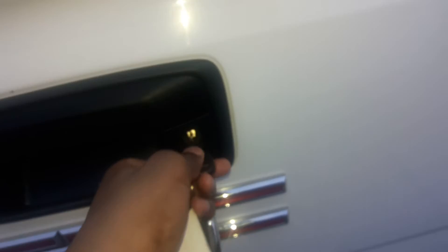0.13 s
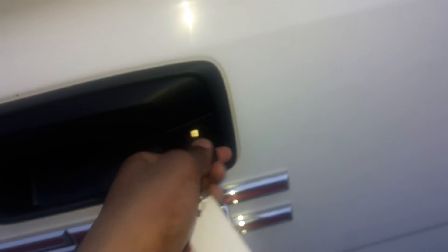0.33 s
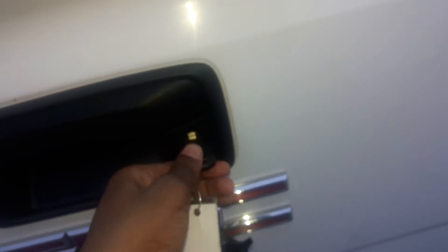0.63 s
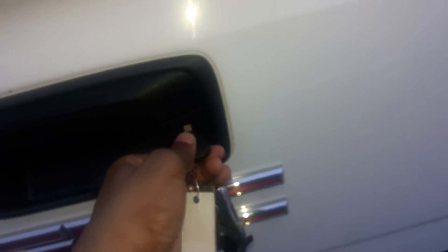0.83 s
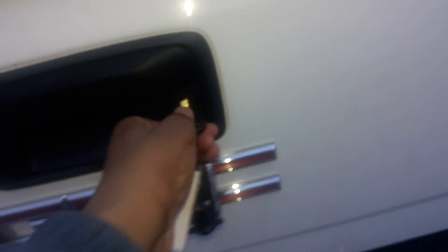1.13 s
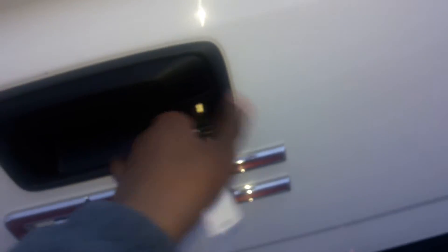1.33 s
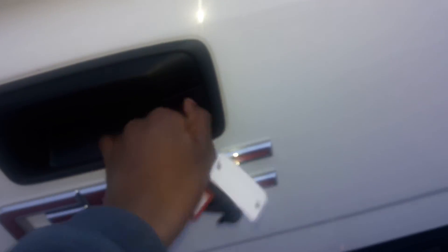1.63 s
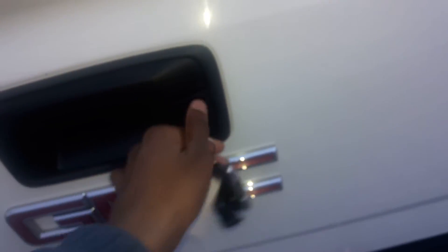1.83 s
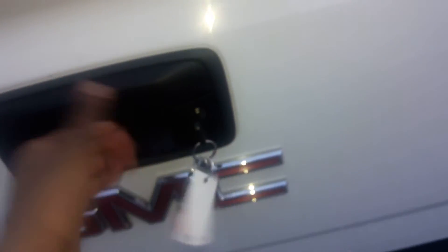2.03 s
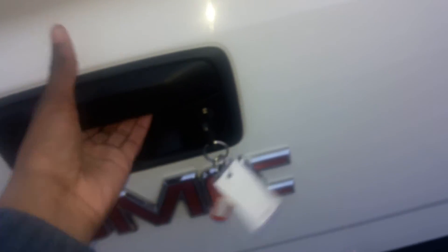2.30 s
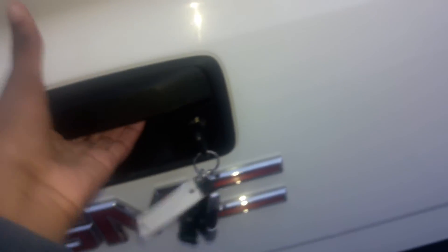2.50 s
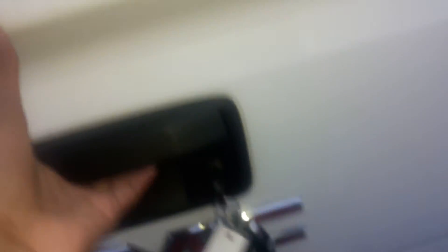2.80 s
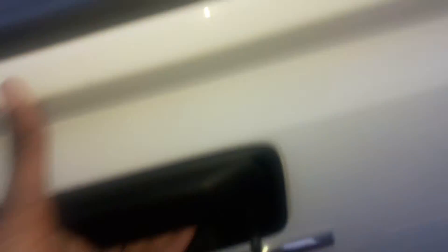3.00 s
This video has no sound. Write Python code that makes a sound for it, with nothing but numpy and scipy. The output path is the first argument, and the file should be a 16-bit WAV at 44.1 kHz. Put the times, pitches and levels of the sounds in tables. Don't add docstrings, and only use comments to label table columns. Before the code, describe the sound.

Keys scrape and click into a tailgate lock, the lock turns with a sharp clack, then the latch clunks loudly; outdoors, faint traffic and wind, close handheld stereo microphone with handling thumps.

```python
import sys
import numpy as np
from scipy import signal
from scipy.fft import rfft, irfft
from scipy.io import wavfile

SR = 44100
rng = np.random.default_rng(int(sys.argv[2]) if len(sys.argv) > 2 else 0)


def store_pcm(level_fs):
    pcm = np.round(np.clip(level_fs, -1, 1) * 32767).astype(np.int16)
    wavfile.write(sys.argv[1], SR, np.atleast_2d(pcm).T)


def elevation(decibels):
    levels = np.asarray(decibels, float)
    return 10 ** (levels / 20)


N = 138915
LEFT_LAG_S = 0.000271


def rms_one(x):
    return x / np.sqrt(np.mean(x ** 2) + 1e-20)


def in_time(rows):
    return np.interp(np.arange(N) / SR, *np.transpose(rows))


def at_hz(hz, points):
    point_hz, level_db = np.transpose(points)
    return np.interp(np.log(hz), np.log(point_hz), level_db)


def colour(x, points):
    hz = np.maximum(np.arange(N // 2 + 1) * SR / N, 1)
    return irfft(rfft(x) * elevation(at_hz(hz, points)), N)


def peak(x, hz, width_hz):
    r = np.exp(-np.pi * width_hz / SR)
    poles = [1, -2 * r * np.cos(2 * np.pi * hz / SR), r * r]
    return signal.lfilter([(1 - r * r) / 2, 0, (r * r - 1) / 2], poles, x + 1e-18)


def cut(x, hz, kind):
    return signal.sosfilt(signal.butter(2, hz, kind, fs=SR, output="sos"), x)


def drift(rate_hz):
    return rms_one(cut(rng.standard_normal(N + SR), rate_hz, "low")[SR:])


def grains(per_s, spread_db):
    hit = rng.random(N) < per_s / SR
    size = elevation(spread_db * np.minimum(rng.exponential(1, N), 4))
    return rms_one(hit * size * rng.choice([-1, 1], N))


def ports(x, pan_db=0., lag_s=0.):
    late = np.interp(np.arange(len(x)) - lag_s * SR, np.arange(len(x)), x)
    return np.array([late * elevation(pan_db / 2), x * elevation(-pan_db / 2)])


def add(out, s, x):
    i = int(s * SR)
    out[..., i:i + x.shape[-1]] += x[..., :N - i]


# hz [Hz], level_db [dB per Hz]
ROAD_SPECTRUM = [(55,-12.5),(250,-4),(520,-8),(800,-1.5),(2050,-17.5),(3300,-41.5),(5200,-52),(16000,-64)]
# start_s [s], level_db [dB]
ROAD_SWELL = [(0,-38),(.3,-35.5),(.55,-37.5),(2.7,-38),(2.9,-41.5),(3.15,-38)]


def traffic():
    roar = rms_one(colour(rng.standard_normal((3, N)), ROAD_SPECTRUM))
    shared = 0.39
    both = np.sqrt(shared) * ports(roar[0], lag_s=0.00025) + np.sqrt(1 - shared) * roar[1:]
    left_db = -1
    swell_db = in_time(ROAD_SWELL) + 4 + 1.45 * drift(18)
    return both * elevation(swell_db) * elevation([[left_db / 2], [-left_db / 2]])


# start_s [s], level_db [dB]
HUM_LEVEL = [(0,-54),(.3,-41),(.7,-39),(.78,-60),(.92,-48),(1.0,-43.5),(1.6,-34),(1.9,-70)]


def panel_hum():
    hum_hz, width_hz = 265.4, 29.5
    narrow = peak(peak(rng.standard_normal(N), hum_hz, width_hz), hum_hz, width_hz)
    return elevation(in_time(HUM_LEVEL)) * rms_one(narrow)


# start_s [s], level_db [dB]
GUST_LEVEL = [(0,-43),(.17,-40.5),(.22,-30.5),(.4,-34.5),(.75,-46.5),(1.0,-37),(1.6,-40),(1.73,-20),(1.84,-26.5),(1.93,-24.5),(2.0,-32),(2.48,-30.5),(2.58,-21.5),(2.72,-22.5),(2.77,-39),(2.9,-25.5),(2.95,-35.5),(3.15,-31)]


def gusts():
    lumps = []
    for _ in range(2):
        x = peak(grains(450, 2.0), 141, 167)
        lumps.append(rms_one(cut(cut(x, 427, "low"), 60, "high")))
    left = elevation(-5.5) * (lumps[1] + lumps[0] / 3)
    return elevation(in_time(GUST_LEVEL) + 3) * np.array([left, lumps[0]])


def boom():
    boom_hz, width_hz = 167.4, 29
    shake = peak(peak(rng.standard_normal(N), boom_hz, width_hz), boom_hz, 2 * width_hz)
    return elevation(in_time(GUST_LEVEL) - 7.5) * rms_one(shake)


# start_s [s], peak_db [dB], top_hz [Hz]
PORT_KNOCKS = [(1.673, -20.5, 1090), (1.727, -42, 1100.0), (1.75, -15.5, 1070), (1.783, -21, 1400.0),
               (1.793, -17.5, 1110), (1.83, -17.5, 1090), (1.844, -22, 1100.0), (1.872, -18, 1110),
               (1.907, -15, 1130), (2.405, -20, 1100.0), (2.568, -17, 1100.0), (2.584, -14.5, 1090),
               (2.796, -16, 910), (2.854, -17, 1120), (2.897, -20, 1100.0), (2.6143, -11, 2000),
               (2.6305, -18.5, 1500), (2.6357, -11.5, 1200), (2.6425, -14, 900), (2.6448, -10, 2130),
               (2.6945, -17.5, 500), (2.6997, -16, 1600), (2.7085, -15, 1310), (.992, -27, 496),
               (1.126, -25.5, 213), (1.31, -24, 330), (1.337, -26.5, 326), (1.924, -19.5, 408),
               (2.224, -23, 430), (2.517, -31, 396)]


def knocks():
    out, click = np.zeros(N), np.eye(1, 2500)[0]
    for s, db, top_hz in PORT_KNOCKS:
        x = peak(click, 180, 242)
        for low_pass_hz in (top_hz, 0.69 * top_hz, 3300, 3600):
            x = cut(x, low_pass_hz, "low")
        x = cut(x, 66, "high")
        add(out, s, elevation(db + 11.5) * x / np.abs(x).max())
    left_db = -37
    return out * elevation([[left_db], [0]])


def slide():
    length_s, from_hz, to_hz = 0.17, 9900, 11900
    out, t = np.zeros((2, N)), np.arange(int(length_s * SR)) / SR
    phase = 2 * np.pi * np.cumsum(np.interp(t, [0, length_s], [from_hz, to_hz])) / SR
    a, b = cut(rng.standard_normal((2, 2, len(t))), 700, "low")
    hiss = rms_one(a * np.cos(phase) + b * np.sin(phase))
    add(out, .165, elevation(-70 + 3 * drift(30)[:len(t)]) * hiss * np.minimum(t / .02, 1))
    return out


# start_s [s], length_s [s], level_db [dB]
KEY_RUBS = [(0.159,0.052,-60),(0.22,.035,-57.5),(0.255,0.1,-64.5),(0.626,0.066,-56),(.84,0.045,-63),(1.325,0.058,-60),(1.435,0.12,-62.5),(1.673,0.09,-58),(1.696,0.043,-43),(1.734,.042,-48.5),(1.86,0.025,-47),(2.002,0.044,-65),(2.135,0.05,-61.5),(2.166,0.021,-62),(2.28,0.11,-62),(2.383,0.11,-65.5),(3.09,0.017,-58.5),(3.115,0.046,-56.5)]
# hz [Hz], level_db [dB per Hz]
RUB_SPECTRUM = [(2000,-7),(3800,1.5),(6300,-5),(7300,1),(8500,-6),(11500,-11.5),(16000,-16)]


def rubs():
    t, shape = np.arange(N) / SR, 0
    for s, length_s, db in KEY_RUBS:
        rise = (t - s) / 0.0099
        fall = (s + length_s - t) / (0.76 * length_s) + 0.52
        shape = shape + elevation(db) * np.clip(np.minimum(rise, fall), 0, 1)
    scratch = [rms_one(colour(grains(3500, 1.7), RUB_SPECTRUM)) for _ in range(3)]
    unsteady = elevation(2.9 * drift(70) + 1.2 * drift(12.0))
    both = 0.39 * ports(scratch[0], lag_s=LEFT_LAG_S) + 0.79 * np.array(scratch[1:])
    return shape * unsteady * both


# hz [Hz], width_hz [Hz], level_db
# [dB]
KEY_MODES = [(3310,1240,-8.5),(4270,1800,-5.5),(5500,780,-2),(7350,294,2.5),(8860,870,-3),(11480,370,-4.5),(12510,310,-2),(13700,4800,-20)]


def metal(x, strengths_db):
    rings = 0
    for k, ((hz, width_hz, db), own_db) in enumerate(zip(KEY_MODES, strengths_db)):
        rings = rings + (-1) ** k * elevation(db + own_db) * peak(x, hz, width_hz)
    crack = cut(cut(x, 2260, "high"), 13500, "low")
    return rings + elevation(-8.5 - 15.5) * crack


# start_s [s], peak_db [dB], brightness [dB per octave]
KEY_TOUCHES_IN = [(.122, -51, -7), (.529, -50, 4), (.612, -50, 1.5), (.648, -41, 1.5), (.691, -52, -1.5),
                  (0.179, -36, -20), (0.1956, -40, -5), (.1915, -46, -2), (0.2294, -48, 7),
                  (.2721, -48, 14), (.3155, -50, 6), (0.3192, -46, 0.1), (.3349, -38.5, 4),
                  (0.3527, -24, -31), (0.3644, -53, 5), (0.4215, -47, 13), (0.5197, -41, -10),
                  (0.5473, -39.5, -11), (0.5701, -45.5, -7), (0.595, -49, 0.1), (0.617, -40, -9),
                  (0.638, -36.5, -4), (0.6675, -38, 1), (0.7276, -38.5, -10.5), (0.8167, -31, -5),
                  (0.9436, -26.5, -2), (0.9777, -31, -2), (1.0585, -47.5, -7), (1.297, -44, -6),
                  (1.345, -28, 59), (1.359, -37, -4), (1.4606, -29.5, -8.5)]
# start_s [s], peak_db [dB], brightness [dB per octave]
KEY_TOUCHES_OUT = [(1.6626, -38, 8), (1.6685, -42, 1.5), (1.6878, -16.5, 6), (1.7083, -19.5, -12),
                   (1.714, -20, 11), (1.7365, -32.5, -6), (1.7445, -44, -3), (1.7547, -30, 1.5),
                   (1.769, -39, -1.5), (1.778, -44, 3), (1.7925, -39, -2), (1.8464, -44, -10),
                   (1.8654, -17.5, 2.5), (1.8891, -31.5, -13), (2.0097, -28, 2.5), (2.0837, -43.5, -5),
                   (2.174, -45.5, 1), (2.1367, -54, -3), (2.191, -45, -2), (2.239, -43.5, -13),
                   (2.2508, -42, -9), (2.2724, -47, -17), (2.2949, -54, -15), (2.326, -51, -10),
                   (2.356, -42, -11), (2.4842, -44.5, -10), (2.668, -44, -8), (2.7476, -17.5, -5),
                   (2.834, -27.5, -2.5)]


def touches():
    out, t = np.zeros((2, N)), np.arange(3000) / SR
    octaves = np.minimum(np.log2(np.array(KEY_MODES)[:, 0] / 7000), .65)
    t60_s, bounce_db = 0.015, -17
    for s, db, tilt_db in list(KEY_TOUCHES_IN) + list(KEY_TOUCHES_OUT):
        later = t - rng.uniform(.004, .011)
        bounce = elevation(bounce_db - 60 * later / t60_s / 2) * (later > 0)
        scuff = (elevation(-60 * t / t60_s) + bounce) * rng.standard_normal((3, len(t)))
        x = metal(scuff, tilt_db * octaves + rng.normal(0, 1.0, len(KEY_MODES)))
        x = ports(x[0], -2, LEFT_LAG_S) + x[1:]
        add(out, s, elevation(db) * x / np.abs(x).max())
    return out


# start_s [s], peak_db [dB], centre_hz [Hz], t60_s [s], left_right_db [dB]
PART_CLACKS = [(.176,-21,900,.02,-4),(1.663,-25,1700,.015,-3),(3.03,-39.5,3400,.015,6),(.352,-22,3870,0.007,0),(1.662,-16.5,3360,0.013,9.5),(1.709,-8,1300,0.026,-1),(2.6135,-17.5,1525,0.0061,-27),(2.6355,-23.5,1900,0.0035,-19),(2.6445,-19,1710,0.006,-22.5),(2.748,-12,1500,.05,-12),(.352,-25,1880,0.011,-4),(3.011,-24,1260,0.033,-9),(1.709,-17,2500,0.018,0),(2.696,-19.5,780,0.036,-27),(2.71,-15.5,870,0.022,-18),(3.006,-18,860,0.083,-19),(3.082,-22,504,0.016,-26),(3.091,-27.5,2330,0.033,11)]


def clacks():
    out, t = np.zeros((2, N)), np.arange(5000) / SR
    span = 1.32
    for s, db, hz, t60_s, pan_db in PART_CLACKS:
        snap = 3.6 * (np.abs(t - .0006) < .00008)
        x = (rng.standard_normal(len(t)) + snap) * elevation(-60 * t / t60_s) * np.minimum(t / 0.00071, 1)
        x = cut(x, hz / span, "high")
        for low_pass_hz in (hz * span, hz * span, 0.88 * hz * span, 1.43 * hz):
            x = cut(x, low_pass_hz, "low")
        add(out, s, ports(elevation(db) * x / np.abs(x).max(), pan_db, LEFT_LAG_S))
    return out


def panel_bursts(rows, points, decay_tilt):
    out, t = np.zeros((2, N)), np.arange(14000) / SR
    edges_hz = 110 * 2 ** np.arange(0, 7.3, .5)
    for s, db, t60_s, tilt_db in rows:
        rattle = elevation(-0.5 * drift(180)[:len(t)] * np.minimum(t / 0.0044, 1))
        white = rng.standard_normal((3, len(t))) * rattle
        white = ports(white[0], lag_s=LEFT_LAG_S) + 1.24 * cut(white[1:], 700, "high")
        x = 0
        for low, high in zip(edges_hz, edges_hz[1:]):
            level_db = at_hz(low * 1.355, points) + tilt_db * np.log2(low / 1000)
            band_t60_s = t60_s * (low / 1000) ** -decay_tilt
            shape = elevation(-60 * t / band_t60_s) * np.minimum(t / 0.00048, 1)
            x = x + elevation(level_db) * cut(white * shape, [low, high], "band")
        add(out, s, elevation(db) * x / np.sqrt(np.mean(x[:, :900] ** 2)))
    return out


# start_s [s], level_db [dB], t60_s [s at 1 kHz], brightness [dB per octave]
LOCK_BLOWS = [
    (0.353,-28,0.0066,0.5),
    (1.459,-38.5,0.043,9.5),
    (1.662,-31.5,0.18,7.5),
    (1.709,-20,0.086,0),
]
# hz [Hz], level_db [dB per Hz]
PANEL_SPECTRUM = [(100,-16),(200,5),(450,-5),(800,-4.5),(1600,-3),(3300,-40),(7300,-37.5),(16000,-82)]


def lock_blows():
    return panel_bursts(LOCK_BLOWS, PANEL_SPECTRUM, 0.96)


# start_s [s], level_db [dB], t60_s [s at 1 kHz], brightness [dB per octave]
LATCH_STRIKES = [
    (2.7455,-16,0.22,-2),
    (2.7478,-15,0.062,3.5),
    (2.76,-15.5,0.16,-2),
]
# hz [Hz], level_db [dB per Hz]
LATCH_SPECTRUM = [(110,-14.5),(250,2.5),(900,-9.5),(1700,-13),(3400,-30),(5500,-40),(7400,-39),(16000,-67)]


def latch_strikes():
    return panel_bursts(LATCH_STRIKES, LATCH_SPECTRUM, 0.51)


# hz [Hz], level_db [dB], t60_s [s]
PANEL_MODES = [(178, -8.5, 0.28), (314, -8.5, 0.25), (568, -14.5, 0.18), (647, -14, 0.24), (835, 2, 0.026),
               (1242, -18.5, 0.22), (1590, -16, 0.2), (1852, -41, 0.82), (2100, -18, 0.11),
               (2490, -54, 0.58)]


def latch_ring():
    out, t, rings = np.zeros((2, N)), np.arange(14000) / SR, 0
    for hz, db, t60_s in PANEL_MODES:
        rings = rings + elevation(db - 60 * t / t60_s) * np.sin(2 * np.pi * hz * t) * rng.choice([-1, 1])
    add(out, 2.748, ports(elevation(-5) * rings * np.minimum(t / .004, 1), lag_s=LEFT_LAG_S))
    return out


def scatter(near):
    t = np.arange(6000) / SR
    tail = rng.standard_normal((2, len(t))) * elevation(-60 * t / 0.29)
    tail = tail / np.sqrt(np.sum(tail[0] ** 2))
    return elevation(-20) * signal.fftconvolve(near, tail, axes=1)[:, :N]


def scene():
    background = traffic() + panel_hum() + gusts() + boom() + knocks()
    keys = rubs() + touches()
    lock = slide() + clacks() + lock_blows()
    latch = latch_strikes() + latch_ring()
    return background + keys + scatter(keys) + lock + latch


def band_limit(x):
    return signal.sosfilt(signal.butter(12, 16820, fs=SR, output="sos"), x)


def record(dry):
    x = signal.sosfilt(signal.cheby2(10, 50, 16700, fs=SR, output="sos"), dry)
    x = cut(x, 29, "high")
    x = 1.15 * np.tanh(x / 1.15)
    return band_limit(x)


dry = scene()
out = record(dry)
store_pcm(out)
```